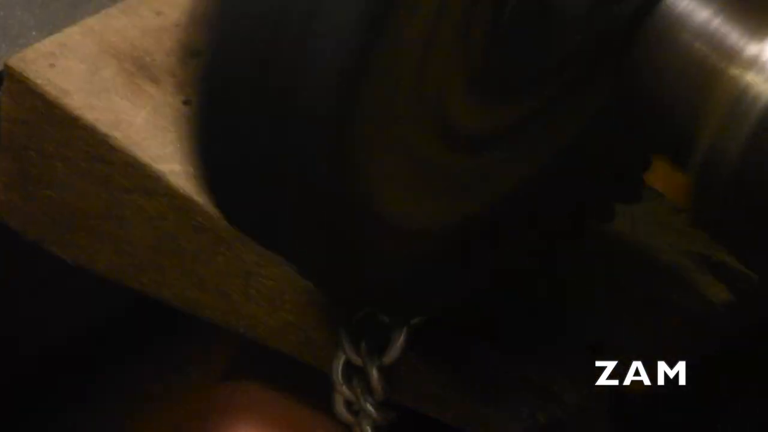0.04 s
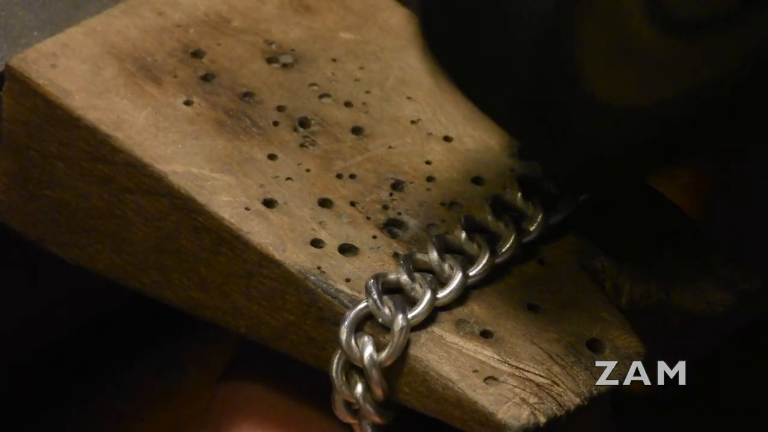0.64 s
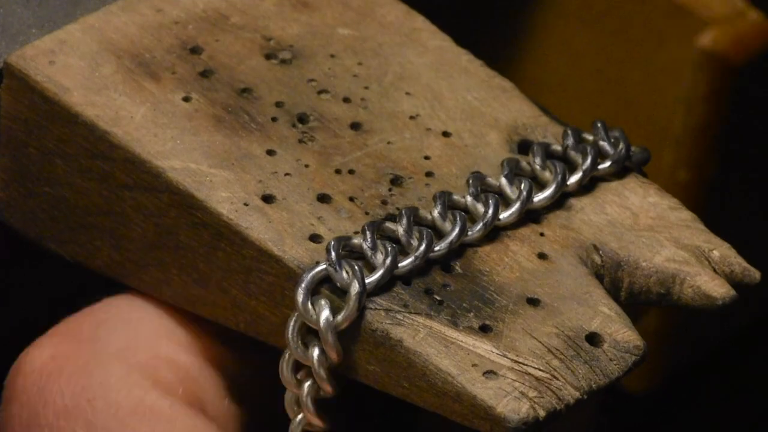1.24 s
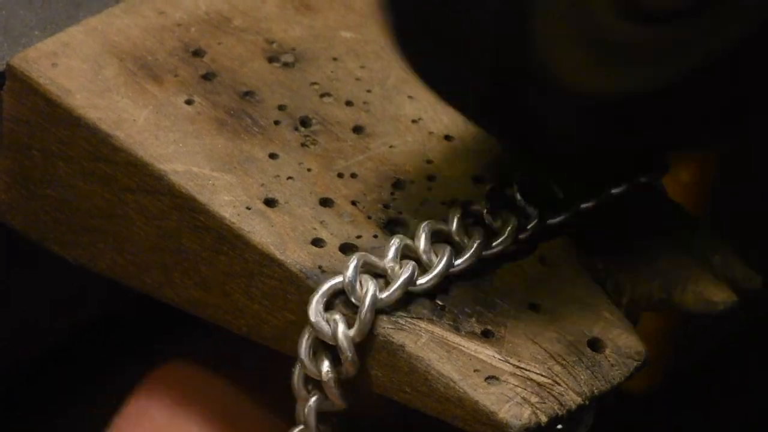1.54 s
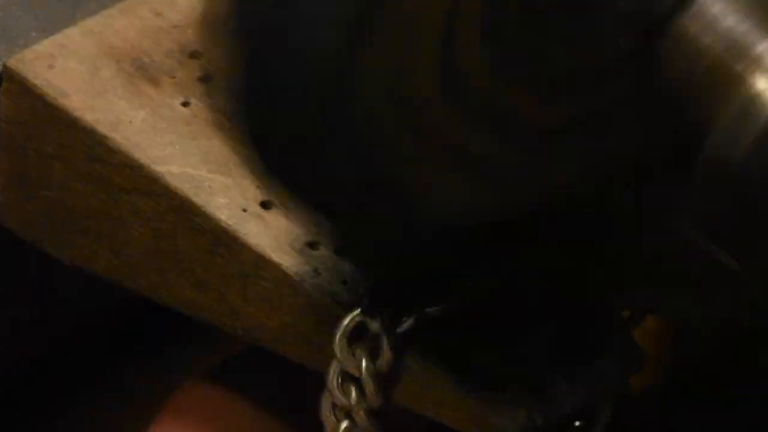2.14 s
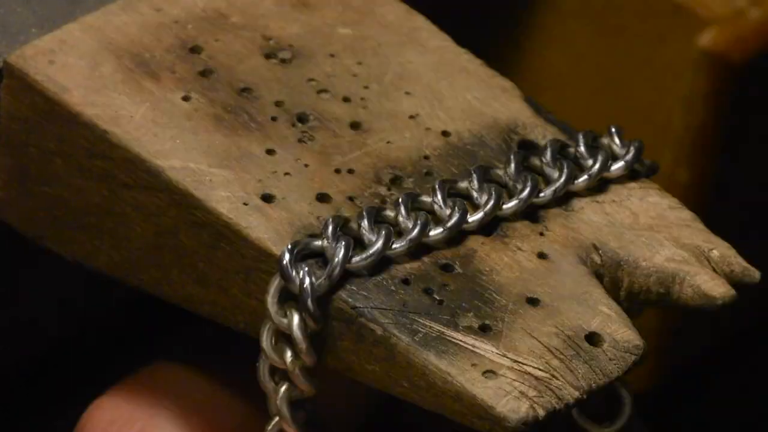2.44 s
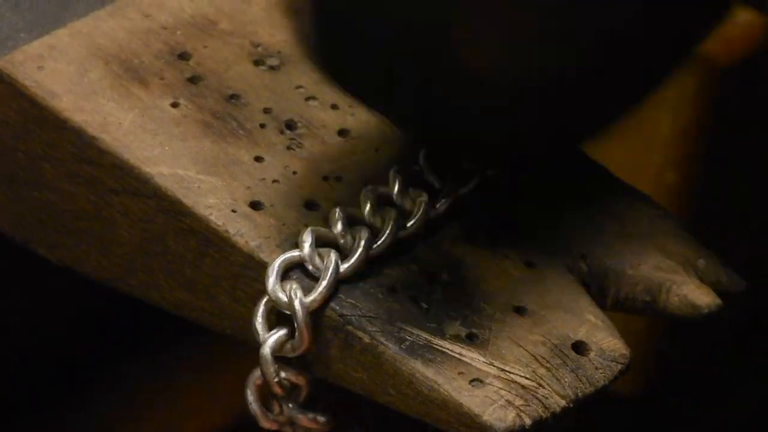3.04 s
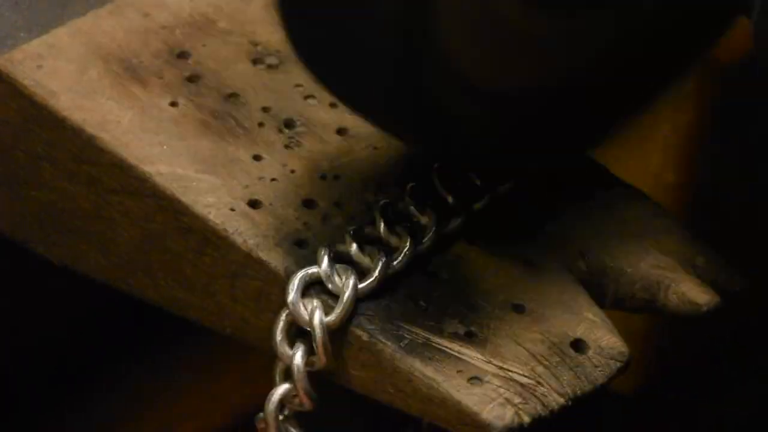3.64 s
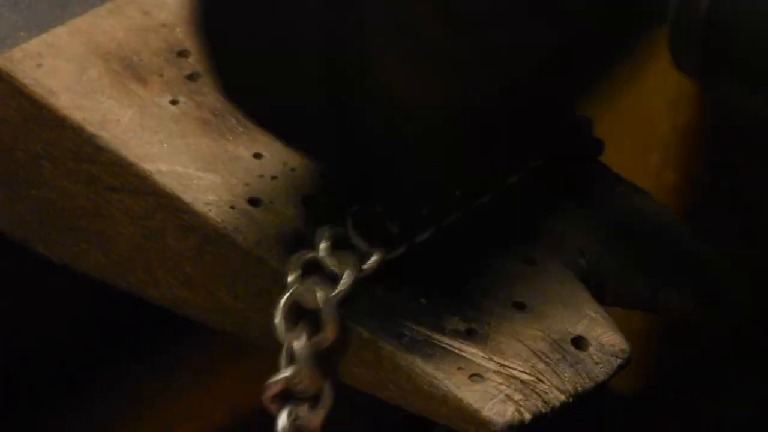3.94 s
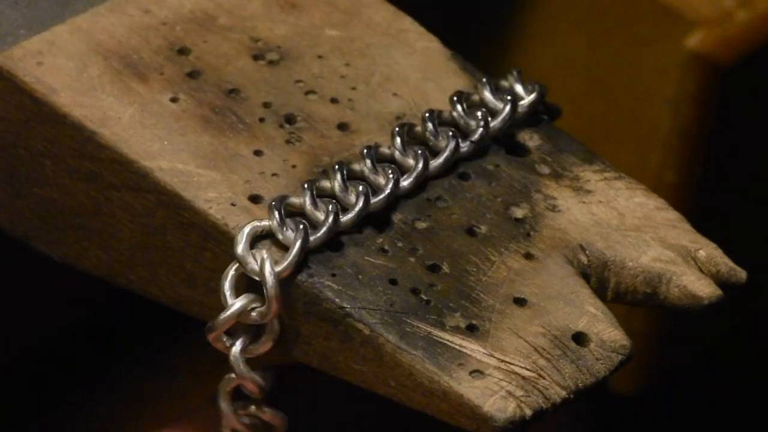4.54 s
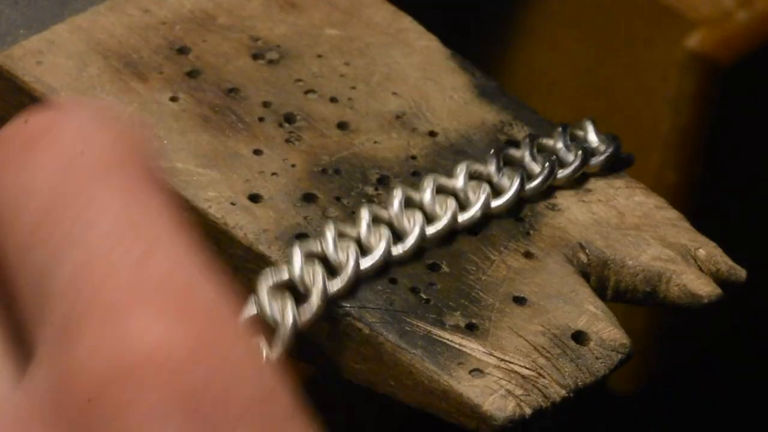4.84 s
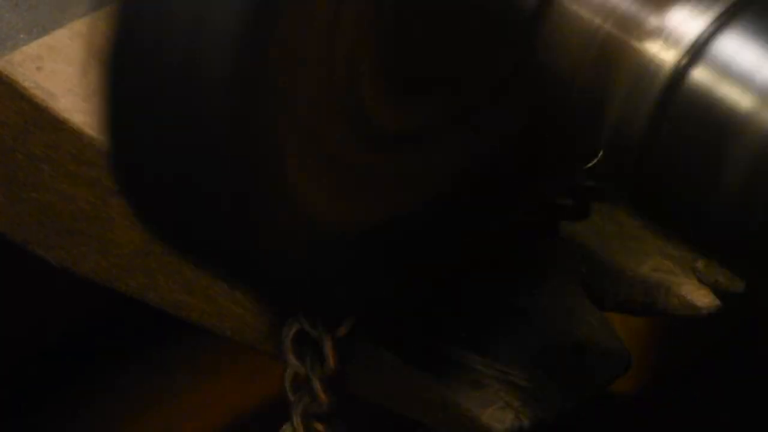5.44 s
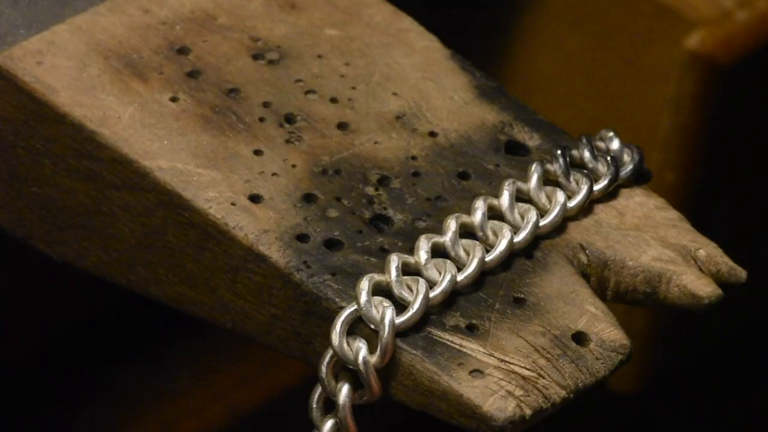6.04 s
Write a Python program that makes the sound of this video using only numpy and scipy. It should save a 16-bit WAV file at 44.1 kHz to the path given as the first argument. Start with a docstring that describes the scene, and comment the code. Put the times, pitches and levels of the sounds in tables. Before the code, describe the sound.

Close by, an air-driven rotary tool polishes chain links in four bursts of hiss and wavering whistle, after a brief motor whine.

```python
"""A silver chain is polished on a wooden bench peg, close by, over a faint workshop hum. For the first 0.8 s a
mains motor whines and sags under load. Then a small rotary tool starts the first of four bursts of hissing air;
its rotor whistles up and down as it is pressed on, and its shank squeals. Soon the wheel rumbles on the wood
and links chatter against it. Then loose links tick, and the chain knocks on the peg, most often in the last two
bursts."""
import sys
import numpy as np
from scipy import signal
from scipy.fft import rfft, irfft
from scipy.io import wavfile

SR = 44100
rng = np.random.default_rng(int(sys.argv[2]) if len(sys.argv) > 2 else 0)


def transcribe(signal):
    """Save signal, clipped to [-1, 1], as a 16-bit WAV file at the path in sys.argv[1]."""
    frames = np.atleast_2d(signal).T
    limited = np.clip(frames, -1, 1)
    pcm = np.round(limited * 32767).astype(np.int16)
    wavfile.write(sys.argv[1], SR, pcm)


N = 277830
TIME = np.arange(N) / SR
REGRIP_S = 2.773  # the grip changes here: hiss and hum take on a new colour


def amp(db):
    """Turns decibels into a gain."""
    return 10 ** (np.asarray(db) / 20)


def unit(x):
    """Scales a sound to an average (rms) size of 1."""
    return x / np.sqrt(np.mean(x ** 2) + 1e-20)


def follow(rows):
    """Joins (seconds, value) points with straight lines."""
    return np.interp(TIME, *np.transpose(rows))


def during(start, end, fade=0.013):
    """1 between two moments and 0 outside, with short ramps."""
    return np.clip((TIME - start) / fade, 0, 1) * np.clip((end - TIME) / fade, 0, 1)


def add(mix, start, sound):
    """Lays a sound into the mix."""
    part = mix[round(start * SR):][:len(sound)]
    part += sound[:len(part)]


def drift(hz):
    """A random wander of size 1, up to about the given rate."""
    f = np.fft.rfftfreq(N, 1 / SR)
    return unit(irfft(rfft(rng.standard_normal(N)) * np.exp(-(f / hz) ** 2), N))


def lift(hz, resonances):
    """How many dB the resonances add at a frequency."""
    return sum(db * np.exp(-((hz - f) / width) ** 2) for f, width, db in resonances)


def noise(points, grain_db=0, hollows=()):
    """Noise of size 1 with the given colour; grain_db makes it gritty."""
    f, db = np.transpose(points)
    hz = np.fft.rfftfreq(N, 1 / SR)
    colour_db = np.interp(np.log(hz + 1), np.log(f), db) + lift(hz, hollows)
    grit = rng.standard_normal(N) * amp(grain_db * drift(900))
    return unit(irfft(rfft(grit) * amp(colour_db), N))


def angle(hz):
    """How far a steady or moving frequency has turned, in radians."""
    return 2 * np.pi * np.cumsum(hz * np.ones(N)) / SR


def ring(hz, width):
    """A resonance kept ringing by noise."""
    turn = angle(hz)
    return (drift(width) * np.cos(turn) + drift(width) * np.sin(turn)) / np.sqrt(2)


def tone(phase):
    """A sine wave of size 1 with a random start."""
    return np.sqrt(2) * np.sin(phase + 2 * np.pi * rng.random())


# Machine tones before and after the grip changes. Each row: pitch in Hz, relative level in dB.
FIRST_HUM = [(376.8, -102), (560, -95), (1125, -90.5), (1685, -94), (2062, -97.5), (2105, -91),
             (2250, -96.5), (2457, -99.5), (2815, -102), (4775, -97)]
SECOND_HUM = [(387.6, -94), (554.5, -95.5), (775.2, -83.5), (958.2, -89.5), (1163, -84.5), (2309, -83),
              (2805, -92), (3876, -92), (4597, -86.5), (5835, -97.5)]
# Fan noise before and after. Each row: frequency in Hz, relative level in dB.
FIRST_FAN = [(30, -16), (260, -16), (380, -13), (460, -8), (560, -22), (720, -13.5), (1130, 3.5),
             (1420, -9), (2100, 1), (2700, -6.5), (4000, -10), (4800, -6), (5700, -14), (16000, -18.5)]
SECOND_FAN = [(30, -31), (200, -30), (300, -19), (385, -12.5), (500, -27.5), (780, -0.5), (900, -11.5),
              (1150, -3), (1600, -9), (2100, -7), (2900, 1), (4800, -7.5), (5150, -8.5), (8200, -11.5),
              (9200, -7.5), (10800, -18), (16000, -18)]


def workshop(first_fan_db=-81.5, second_fan_db=-67, tones_db=1.5, waver=.002):
    """Fans and idling machines hum: wavering tones in soft noise."""
    def hum(rows):
        """Tones that waver a little in level and pitch."""
        return sum(amp(db + 1.4 * drift(15)) * tone(angle(hz * (1 + waver * drift(30))))
                   for hz, db in rows)
    first = amp(tones_db) * hum(FIRST_HUM) + amp(first_fan_db) * noise(FIRST_FAN)
    second = amp(tones_db) * hum(SECOND_HUM)
    second += amp(second_fan_db) * noise(SECOND_FAN, grain_db=1.0, hollows=TOOL_HOLLOWS)
    return np.where(TIME < REGRIP_S, first, second)


# The motor slows down. Each row: time in seconds, shaft turns per second.
SHAFT_SPEED = [(0, 286.6), (.2, 285.6), (.49, 286.3), (.56, 281), (.63, 273), (.69, 267.5), (.8, 265.5)]
# The shaft's tones. Each row: multiple of the shaft speed, relative level in dB.
SHAFT_TONES = [(1, -75), (2, -69.5), (4, -72), (5, -62), (6, -60), (7, -60.5), (9, -65), (17, -61),
               (18, -62.5), (21, -68), (24, -66), (28, -69), (34, -55.5)]
# The mains splits the whine of the motor's slots into side tones.
# Each row: distance from the whine in steps of the mains frequency, relative level in dB.
SLOT_WHINE = [(-2, -73), (-1, -58), (0, -60.5), (1, -55.5), (2, -86), (3, -59.5)]
# Brush and bearing noise. Each row: frequency in Hz, relative level in dB.
BRUSH_COLOUR = [(35, -79), (60, -39), (184, -30.5), (268, -11.5), (458, -23), (553, -14.5), (749, -15),
                (1200, -3), (1860, -9.5), (2900, -8.5), (3500, -8), (4220, -8), (7400, -11.5), (9790, -8),
                (16000, -25.5)]
# Where the housing rings. Each row: pitch in Hz, width in Hz, relative level of its noise in dB,
# boost in dB for a tone that lands there.
HOUSING_RINGS = [(141.3, 19, -80, 0), (269.6, 8, -73, 9), (1238, 120, -59, -6), (1610, 71, -72, 4.5),
                 (2550, 53, -59.5, 2), (3180, 67, -54.5, 7.5), (3535, 170, -52, 4), (4560, 210, -72, 9)]


def motor(mains_hz=60, slots=12, off_s=.818, jitter=0.00286, flutter_db=2.0, brush_db=-43.57,
          throb=0.037, load_db=-6, level_db=-0.05):
    """A mains motor whines over its brush noise; as it sags, its tones slide onto housing resonances."""
    hz = follow(SHAFT_SPEED)
    load = (hz.max() - hz) / np.ptp(hz)  # 0 at its fastest, 1 at its slowest
    mains = angle(mains_hz)
    shaft = angle(hz * (1 + jitter * drift(60) + 0.0046 * np.sin(mains)))
    boosts = [(f, width, db) for f, width, _, db in HOUSING_RINGS]

    def partial(db, order, offset):
        """One fluttering tone: load damps the high ones, the housing lifts those it rings with."""
        db = db + load_db * load * order / 20 + lift(order * hz + offset * mains_hz, boosts)
        return amp(db + flutter_db * drift(25)) * tone(order * shaft + offset * mains)
    tones = sum(partial(db, order, 0) for order, db in SHAFT_TONES)
    whine = sum(partial(db, slots, offset) for offset, db in SLOT_WHINE)
    brushes = amp(brush_db + .5 * drift(30)) * noise(BRUSH_COLOUR, grain_db=1.0)
    housing = sum(amp(db) * ring(f, width) for f, width, db, _ in HOUSING_RINGS)
    pulsing = 1 + throb * np.cos(2 * mains)
    return amp(level_db) * during(-1, off_s) * (tones + whine + (brushes + housing) * pulsing)


# The small tool's bursts. Each row: throttle opens in seconds, rise time in seconds, throttle shuts
# in seconds, wheel lifts in seconds, relative air level in dB, opening surge in dB, slope while held
# in dB per second, fade in dB per second, whistle against the air in dB, relative shank level in dB.
TOOL_BURSTS = [(0.791, 0.026, 1.239, 1.26, -47, 0, -0.5, 225, -5.5, -62.5),
               (1.549, 0.026, 2.318, 2.375, -48, 3, 1, 300, 0, -62.5),
               (2.932, 0.037, 4.469, 4.475, -48, 3, -0.5, 180, 1, -62),
               (5.078, 0.037, 5.86, 5.9, -48.5, -2, 1.2, 158, 1, -61)]
# The speed the rotor heads for as the hand presses and eases, one list per burst.
# Each row: time in seconds, turns per second.
ROTOR_TARGETS = [
    [(.8, 2054), (1.24, 2040)],
    [(1.62, 3310), (1.66, 2706), (1.8, 2423), (1.85, 2433), (1.88, 2166), (1.93, 2013), (2.1, 1922),
     (2.27, 1940), (2.32, 1630)],
    [(2.99, 3500), (3.08, 2360), (3.14, 2213), (3.21, 2240), (3.25, 2026), (3.33, 1975), (3.37, 1842),
     (3.48, 2186), (3.51, 2062), (3.68, 1995), (3.74, 1880), (3.82, 1940), (3.92, 2087), (3.96, 1995),
     (4.01, 2150), (4.07, 2080), (4.11, 1843), (4.33, 1747), (4.39, 1965), (4.44, 1895)],
    [(5.16, 1770), (5.335, 1654), (5.37, 1900), (5.45, 1997), (5.52, 1930), (5.63, 1900), (5.68, 2180),
     (5.75, 2010), (5.85, 2030)],
]


def throttle(surge_at_s=0.05, surge_s=.018, ease_off_s=.013, valve_s=0.128, cut_s=0.023,
             lift_off_s=0.028, spin_up_s=.022, coast_s=.3):
    """Air builds up, holds and fades until the valve closes; the rotor spins up and coasts down."""
    flow, whistle, rubbing, rotor_hz = np.zeros((4, N))
    for burst, target in zip(TOOL_BURSTS, ROTOR_TARGETS):
        on, rise, off, lifts, air_db, surge_db, slope_db, fade_db, whistle_db, shank_db = burst
        since_open = np.maximum(TIME - on, 0)
        since_shut = ease_off_s * np.logaddexp(0, (TIME - off) / ease_off_s)  # the finger eases off
        surge = surge_db * np.exp(-((since_open - surge_at_s) / surge_s) ** 2)
        build_up = np.minimum(since_open / rise, 1) ** 2
        air = build_up * amp(air_db + surge + slope_db * since_open - fade_db * since_shut)
        flow += air * during(on, off + valve_s)
        # only a driven rotor whistles
        whistle += air * amp(whistle_db) * during(on, off + cut_s, fade=cut_s)
        rubbing += amp(shank_db) * during(on + rise / 2, lifts, fade=lift_off_s)
        spin = (1 - np.exp(-since_open / spin_up_s)) * np.exp(-since_shut / coast_s)
        rotor_hz = np.where(TIME > on, follow(target) * spin, rotor_hz)
    return flow, whistle, rubbing, rotor_hz


# Air hiss in the first and second grip. Each row: frequency in Hz, relative level in dB.
FIRST_HISS = [(30, -18), (150, -18), (400, -17), (1200, -13.5), (1750, -13), (2800, -12), (3800, -13.5),
              (4500, -8.5), (6400, -9), (7500, -1.5), (8800, -1), (9800, 2), (11700, -0.5), (12600, -4.5),
              (15800, -4)]
SECOND_HISS = [(30, -15), (200, -16.5), (1100, -15), (1700, -16.5), (2700, -9), (3700, -13), (5200, -9),
               (6400, -10), (8500, -1), (9200, -5), (11500, 0), (12400, -4.5), (13600, -3.5), (15000, 0),
               (15900, -1.5)]
# The rotor's whistle. Each row: multiple of the rotor speed, relative level in dB.
ROTOR_TONES = [(1, -21.5), (2, -31), (3, -27.5), (5, -18.5), (6, -12.5), (7, -27)]
# Hollows around the tool colour its whistle and, in the second grip, the hiss and fan noise.
# Each row: pitch in Hz, width in Hz, boost in dB.
TOOL_HOLLOWS = [(1060, 150, 3.5), (3320, 470, 0.5), (4500, 500, 4.5), (5680, 175, 4.5), (6580, 370, 3.5),
                (7570, 100, 3), (8610, 270, 3), (9505, 120, 2), (12020, 190, 2), (12800, 300, 3.5)]


def air_tool(flow, whistle_gain, rotor_hz, first_db=0.63, second_db=0.68, wobble=.004, hand_wobble=.003,
             skip_hz=2460, skip_wobble=.12, flutter_db=2.0, breakup=0.57, exhaust_hz=2050):
    """Air hisses through the tool and spins a six-bladed rotor, whose whistle keeps breaking up."""
    first = amp(first_db) * noise(FIRST_HISS, grain_db=0.9)
    second = amp(second_db) * noise(SECOND_HISS, grain_db=1.24, hollows=TOOL_HOLLOWS)
    # at high speed the wheel only skips on the chain, and the pitch turns rough
    skipping = skip_wobble * np.maximum(rotor_hz / skip_hz - 1, 0)
    rotor = angle(rotor_hz * (1 + (wobble + skipping) * drift(110.5) + hand_wobble * drift(24.87)))
    whistle = np.zeros(N)
    for order, db in ROTOR_TONES:
        hz = order * rotor_hz
        escaping = np.minimum(hz / exhaust_hz, 1) ** 10  # the small exhaust lets no low tones out
        broken = 1 + breakup * np.tanh(2 * drift(30))
        level = amp(db + lift(hz, TOOL_HOLLOWS) + flutter_db * drift(60))
        whistle += escaping * broken * level * tone(order * rotor)
    return flow * np.where(TIME < REGRIP_S, first, second) + whistle_gain * whistle


# The wheel grabs and the shank squeals. Each row: middle in seconds, half length in seconds, boost in dB.
SHANK_SQUEALS = [(1.02, .015, 6), (1.603, 0.011, 13.5), (2.007, 0.063, 4.5), (3.19, 0.06, 6.5),
                 (4.172, .025, 5.5), (4.411, .015, 5), (5.37, .008, 8), (5.74, .07, 2)]


def shank(rubbing, rotor_hz, pitch_hz=2170, wander=0.01106, loaded_hz=2150, ease_db_per_khz=-4.5,
          clear_db=-6, rough_db=-2, slip_db=1.5, grip_db=1.0):
    """Friction rings the wheel's stem, the shank, in uneven slips: a narrow squeal in a rougher band."""
    hz = pitch_hz * (1 + wander * drift(13.92))
    eased_db = ease_db_per_khz * np.maximum(rotor_hz - loaded_hz, 0) / 1000  # softer when running free
    squeal_db = sum(db * np.exp(-((TIME - middle) / half) ** 2) for middle, half, db in SHANK_SQUEALS)
    song = amp(clear_db) * ring(hz, width=30) + amp(rough_db) * ring(hz, width=170)
    level = rubbing * amp(eased_db + squeal_db + grip_db * drift(14))
    slips = unit(amp(slip_db * drift(210)))
    return level * song * slips


# The wheel drags on the peg. Each row: start in seconds, length in seconds, level in dB.
WHEEL_DRAGS = [(0.835, 0.27, -77), (1.083, .17, -69), (1.914, 0.14, -74), (5.717, 0.096, -71)]
# The colour of its rumble. Each row: frequency in Hz, relative level in dB.
RUMBLE_COLOUR = [(30, -9), (130, -1.5), (350, -4.5), (700, -10), (2000, -45)]


def drags():
    """The wheel rubs on the wood with a low rumble."""
    contact = sum(amp(db) * during(start, start + length, fade=0.024)
                  for start, length, db in WHEEL_DRAGS)
    return contact * noise(RUMBLE_COLOUR)


# Links touch the wheel. Each row: start in seconds, length in seconds, relative level in dB.
LINK_CHATTER = [(1.002, 0.045, -65), (1.1, 0.035, -69), (1.184, 0.031, -64), (1.774, 0.028, -58),
                (1.909, 0.036, -63), (1.994, 0.0523, -64.5), (2.085, 0.024, -57), (2.111, 0.054, -61),
                (2.262, 0.037, -61), (3.709, 0.036, -64), (3.927, 0.025, -59), (4.386, 0.035, -69)]


def chatter(pitch_hz=2780, width_hz=330, bounce_hz=230, level_db=0.5):
    """A link bounces quickly on the wheel and buzzes."""
    contact = sum(amp(db) * during(start, start + length) for start, length, db in LINK_CHATTER)
    bounces = 1 + np.cos(angle(bounce_hz * (1 + 0.23 * drift(33.3))))
    return amp(level_db) * contact * unit(bounces * ring(pitch_hz, width_hz))


# Loose links tick. Each row: start in seconds, relative level in dB.
LINK_TICKS = [(1.3532, -52), (1.379, -59), (1.3904, -70), (1.508, -69), (2.576, -57), (2.5909, -55),
              (2.9383, -47)]
# A tick is mostly treble. Each row: frequency in Hz, relative level in dB.
TICK_TREBLE = [(100, -25), (1500, -8), (6000, -2), (16000, 1)]


def ticks(level_db=-3, decay_s=0.0021):
    """Link hits link with a tiny dry tick."""
    blows = sum(amp(db) * (TIME > start) * np.exp(-abs(TIME - start) / decay_s)
                for start, db in LINK_TICKS)
    return amp(level_db) * blows * noise(TICK_TREBLE)


# The chain knocks on the peg. Each row: start in seconds, relative peak level in dB.
CHAIN_KNOCKS = [(1.594, -55), (1.634, -56), (2.576, -55.5), (2.587, -56), (2.986, -60), (3.091, -59),
                (3.131, -52), (3.178, -48), (3.227, -48.5), (3.256, -48), (3.312, -44), (3.473, -50.5),
                (3.514, -48.5), (3.591, -48.5), (3.599, -49), (3.811, -57), (3.823, -45.5), (4.197, -53),
                (4.208, -48), (5.387, -42), (5.394, -51), (5.405, -46), (5.467, -51), (5.545, -49),
                (5.567, -52), (5.585, -43.5), (5.607, -46.5)]
# The notes of the wood. Each row: pitch in Hz, relative level in dB, seconds to fade by 60 dB.
PEG_NOTES = [(336, -24, 0.05), (573, -12.5, 0.051), (797, 2.5, 0.022), (1000, 7, 0.012), (1250, 7.5, 0.015),
             (1640, 5, 0.013), (1970, 2, 0.0077)]


def knocks(level_db=1, scuff=0.089, scuff_s=0.0078, detune=0.065, low_hz=280):
    """A blow and a short scuff ring the peg; each lands on a different spot, which shifts the notes."""
    out = np.zeros(N)
    t = np.arange(SR // 10) / SR
    bass_cut = signal.butter(3, low_hz, "high", fs=SR, output="sos")  # the peg is too small for bass
    for start, peak_db in CHAIN_KNOCKS:
        wood = np.zeros(len(t))
        for hz, db, fade_s in PEG_NOTES:
            shifted_hz = hz * (1 + detune * rng.standard_normal())
            wood += amp(db - 60 * t / fade_s) * np.sin(2 * np.pi * shifted_hz * t)
        blow = (t == 0) + scuff * rng.standard_normal(len(t)) * np.exp(-t / scuff_s)
        knock = signal.sosfilt(bass_cut, signal.fftconvolve(blow, wood))
        add(out, start, amp(peak_db + level_db) * knock / abs(knock).max())
    return out


def scene():
    """Adds up all the sounds, alike in both channels."""
    flow, whistle_gain, rubbing, rotor_hz = throttle()
    tool = air_tool(flow, whistle_gain, rotor_hz) + shank(rubbing, rotor_hz)
    mono = motor() + tool + chatter() + drags() + knocks() + ticks() + workshop()
    return np.array([mono, mono])


def record(dry):
    """Cuts away the very highest treble."""
    low_pass = signal.firwin(801, cutoff=15780, window=("kaiser", 8), fs=SR)
    return signal.oaconvolve(dry, low_pass[None], "same", axes=1)


dry = scene()
out = record(dry)
transcribe(out)
```